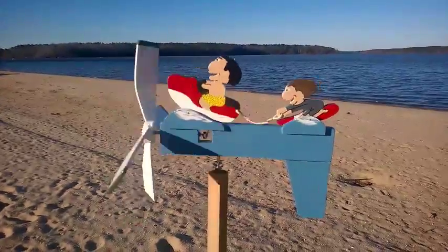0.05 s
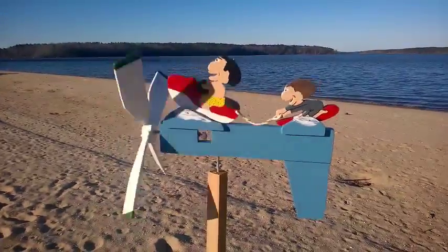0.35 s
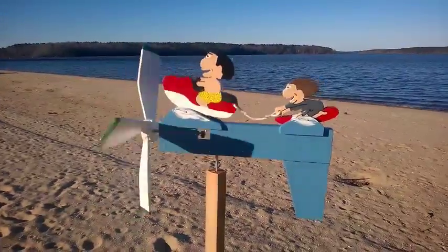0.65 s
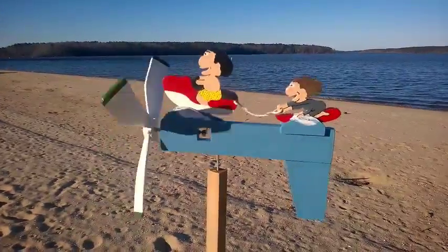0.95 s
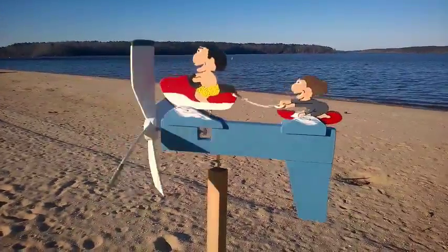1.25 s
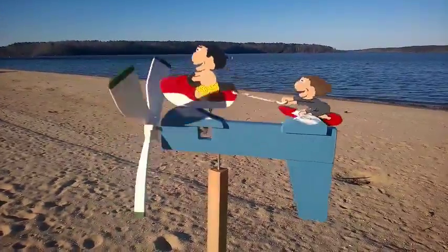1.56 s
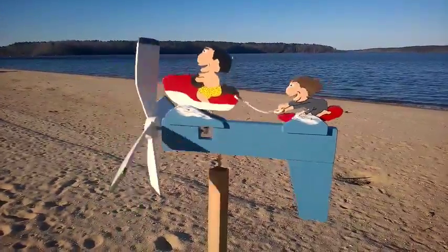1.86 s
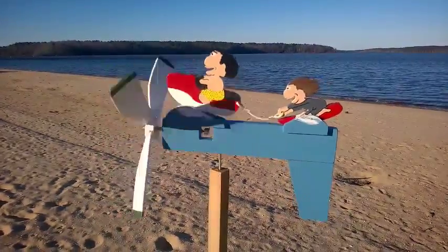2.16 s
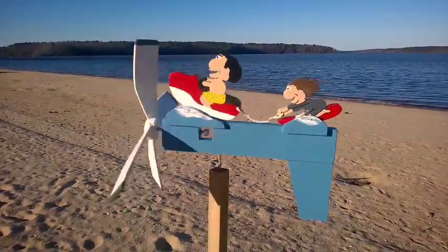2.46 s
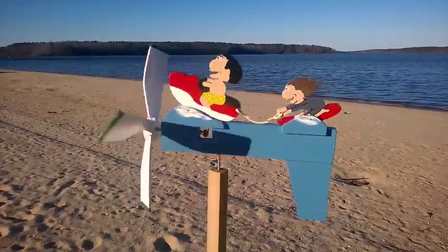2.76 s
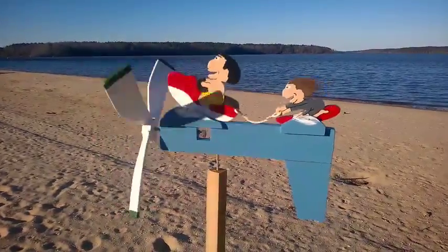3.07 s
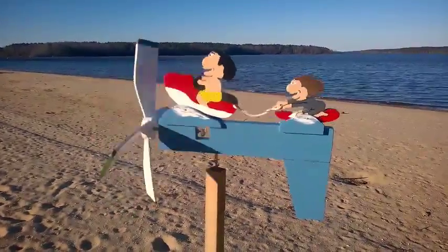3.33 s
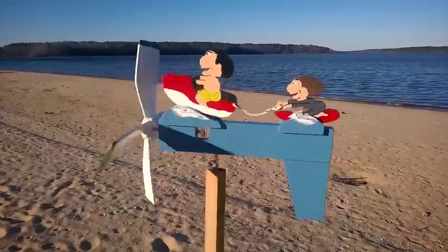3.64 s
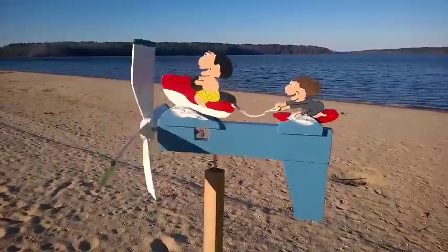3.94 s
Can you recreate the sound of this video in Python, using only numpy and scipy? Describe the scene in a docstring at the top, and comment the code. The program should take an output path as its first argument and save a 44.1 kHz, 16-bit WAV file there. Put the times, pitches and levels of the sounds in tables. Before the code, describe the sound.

A wooden whirligig clacks and rattles close by for the whole four seconds, its quick, uneven hollow knocks mixed with wire ticks and brief scrapes. Some knocks ring briefly between about 1 and 2.5 seconds, and the sharpest come near 3.4 and 3.7 seconds. Small waves wash softly behind. Wind rumbles on the microphone with a few dull thumps, gusting hardest just before 3 seconds.

```python
"""Wooden clacks and rattles from a whirligig turning in a breeze, about three turns a second.
Its wire crank jerks two plywood figures: loose joints knock, the hollow housing answers,
one figure rings on some turns, and the wire ticks, scrapes and rubs in its holes.
Small waves wash a lake beach behind it; wind buffets the microphone."""
import sys
import numpy as np
from scipy import signal
from scipy.fft import rfft, irfft
from scipy.io import wavfile
from scipy.ndimage import uniform_filter1d

SR = 44100
rng = np.random.default_rng(int(sys.argv[2]) if len(sys.argv) > 2 else 0)


def store_pcm(level_fs):
    """Save levels as 16-bit WAV."""
    pcm = np.round(np.clip(level_fs, -1, 1) * 32767).astype(np.int16)
    wavfile.write(sys.argv[1], SR, np.atleast_2d(pcm).T)


N = 176400
T = np.arange(SR // 7) / SR  # time axis of one blow, s
ATTACK_SAMPLES = 220
KNOCK_RISE_S, KNOCK_T60_S, TONE_T60_S = 0.0013, 0.024, 0.029
HOUSING_RISE_S, LINK_HZ = 0.0046, 3125


# Each row: start in seconds, knock level in dB, knock pitch in Hz, housing in dB, wire in dB.
JOINT_CLACKS = [(0.0384, -46.5, 2750, -56, -71), (0.0502, -52.5, 2600, -64.5, -78),
                (0.2553, -60, 3630, -63.5, -65), (0.302, -51, 2880, -72, -62),
                (0.396, -47.5, 2790, -60.5, -65), (0.7499, -48.5, 2800, -55.5, -65),
                (1.1011, -48.5, 2700, -53, -64.5), (1.31, -56, 2730, -63, -63.5),
                (1.4519, -52, 2790, -57, -66), (1.7927, -51.5, 2790, -51, -64),
                (1.993, -56, 3330, -61.5, -63), (2.04, -50.5, 3046, -61, -68),
                (2.136, -48.5, 2750, -55.5, -64.5), (2.4869, -47, 2726, -54.5, -70),
                (2.683, -52.5, 3100, -64, -55.5), (2.838, -53, 2790, -59.5, -65.5),
                (3.1716, -51.5, 2660, -55, -66), (3.4027, -48.5, 2940, -53, -57.5),
                (3.429, -42, 2980, -62.5, -52), (3.4323, -52, 3290, -76, -58),
                (3.51, -52.5, 2800, -71, -68), (3.7239, -49.5, 2780, -59, -66),
                (3.7312, -48, 2880, -50, -55), (3.8149, -54.5, 2760, -59.5, -66),
                (3.981, -53, 3110, -59.5, -67)]

def clacks():
    """Each joint cracks as it seats and sets the hollow housing sounding."""
    out = np.zeros(N)
    for start_s, knock_db, hz, housing_db, wire_db in JOINT_CLACKS:
        add(out, start_s, amp(knock_db) * knock(hz, tone_db=2.5))
        add(out, start_s, amp(housing_db) * housing())
        add(out, start_s, amp(wire_db) * wire_click())
    return out


# Spectrum of struck wood. Each row: frequency in Hz, gain in dB.
WOOD_SPECTRUM = [(500, -10.5), (1800, -2), (2250, -6), (2950, -1.5), (3700, -5.5), (5400, -4), (6800, -15),
                 (7700, -20.5), (14000, -48)]
# Upper modes of a joint. Each row: frequency in Hz, relative level in dB.
JOINT_MODES = [(3960, -10), (4380, -6.5), (4880, -16), (5600, -12), (6770, -17)]

def knock(hz, tone_db=4, upper_t60_s=0.02, chatter_db=-8.5, chatter_t60_s=0.11, ring_q=12, ring_db=11):
    """Wood on wood: a dry crack, a leading mode, weaker upper ones, then ringing chatter."""
    wood = colour(WOOD_SPECTRUM)
    crack = unit_attack(burst(dying(KNOCK_RISE_S, KNOCK_T60_S), wood))
    chatter = signal.fftconvolve(grainy(len(T)), wood)[:len(T)]
    ringing = signal.lfilter(*signal.iirpeak(hz, ring_q, SR), chatter)
    chatter = unit_rms(chatter + amp(ring_db) * ringing) * dying(KNOCK_RISE_S, chatter_t60_s)
    tone = dying(KNOCK_RISE_S, TONE_T60_S) * sine(hz)
    upper = sum(amp(db - tone_db + 2 * rng.standard_normal()) * sine(mode_hz, rng.random())
                for mode_hz, db in JOINT_MODES)
    modes = unit_attack(tone + upper * dying(KNOCK_RISE_S, upper_t60_s))
    return unit_attack(crack + amp(tone_db) * modes) + amp(chatter_db) * chatter


# Response of the housing. Each row: frequency in Hz, gain in dB.
HOUSING_SPECTRUM = [(150, -1.5), (350, -10), (640, 4), (820, -2.5), (1150, -0.5), (1700, -8), (2100, -12),
                    (9000, -46.5)]

def housing(t60_s=0.22):
    """The housing answers a blow with a hollow knock."""
    return unit_rms(burst(dying(HOUSING_RISE_S, t60_s), colour(HOUSING_SPECTRUM)), size=970)


# Spectrum of a wire contact. Each row: frequency in Hz, gain in dB.
WIRE_SPECTRUM = [(2000, -10), (5500, 3.5), (7800, -9), (9200, -0.5), (12000, -9.5), (14400, -10),
                 (15100, -4), (16200, -34)]

def wire_click(rise_s=0.00027, t60_s=0.03):
    """Wire contact: a short, bright burst."""
    return unit_attack(burst(dying(rise_s, t60_s), colour(WIRE_SPECTRUM)))


# Each row: start in seconds, level in dB.
LINK_TAPS = [(0.058, -51), (.315, -59), (.408, -56.5), (0.441, -63), (.6554, -53.5), (.7642, -47),
             (1.011, -58.5), (1.159, -49.5), (1.466, -54.5), (1.487, -56.5), (1.753, -56), (1.801, -53.5),
             (1.842, -57), (2.188, -58), (2.669, -53.5), (3.041, -50.5), (3.236, -55.5), (3.524, -56.5),
             (3.6516, -51), (3.7395, -50), (3.771, -50.5)]

def taps(housing_db=-15, wire_db=-17):
    """A loose link taps back between blows and barely stirs the housing."""
    out = np.zeros(N)
    for start_s, db in LINK_TAPS:
        hollow = amp(housing_db) * housing()
        bright = amp(wire_db) * wire_click()
        add(out, start_s, amp(db) * (knock(LINK_HZ) + hollow + bright))
    return out


# Each row: start in seconds, level in dB.
FIGURE_STRIKES = [(1.11, -49), (1.462, -51.5), (1.62, -54), (1.803, -46), (2.144, -52.5), (2.490, -56),
                  (3.848, -50)]
# Each row: frequency in Hz, relative level in dB.
FIGURE_MODES = [(1198, 3.5), (1130, -11), (1424, -14.5), (1540, -13.5)]

def figure_rings(t60_s=0.11, judder_t60_s=0.19, judder_db=-9, detune=0.0056):
    """A plywood figure, struck at the end of its stroke, rings and judders against its stop."""
    out = np.zeros(N)
    for start_s, db in FIGURE_STRIKES:
        modes = sum(amp(mode_db) * sine(hz * (1 + detune * rng.standard_normal()), rng.random())
                    for hz, mode_db in FIGURE_MODES)
        ring = unit_rms(modes * dying(KNOCK_RISE_S, t60_s))
        contact = modes * dying(KNOCK_RISE_S, KNOCK_T60_S)
        judder = unit_rms(burst(dying(HOUSING_RISE_S, judder_t60_s), contact))
        add(out, start_s, amp(db) * unit_rms(ring + amp(judder_db) * judder, size=400))
    return out


# Each row: start in seconds, level in dB, pitch in Hz.
FRAME_THUMPS = [(.298, -32, 38.7), (0.649, -31.5, 100), (.749, -32.5, 49), (1.099, -29.5, 55),
                (3.18, -44, 218), (3.731, -25, 47.3), (3.733, -44, 646), (3.736, -42.5, 186.5)]

def thumps(rise_s=0.00597, t60_s=0.096):
    """The frame lurches in dull, heavily damped swings."""
    out = np.zeros(N)
    for start_s, db, hz in FRAME_THUMPS:
        add(out, start_s, -amp(db) * dying(rise_s, t60_s) * sine(hz))
    return out


# Each row: start in seconds, length in seconds, level in dB.
LINKAGE_SCRAPES = [(1.337, 0.045, -63.5), (1.753, 0.047, -63), (1.782, 0.029, -55.5), (2.351, 0.066, -67),
                   (3.409, .035, -56.5), (3.618, 0.058, -62), (3.932, 0.13, -61)]

def scrapes(slips_per_s=190, grit_db=-10, wire_db=-4):
    """Wire sticks and slips on wood: uneven contacts, each gritty and briefly ringing."""
    out = np.zeros(N)
    bodies = colour(WOOD_SPECTRUM), damped_sine(LINK_HZ, TONE_T60_S), colour(WIRE_SPECTRUM)
    for start_s, length_s, db in LINKAGE_SCRAPES:
        size = int(length_s * SR)
        slips = unit_rms(rng.standard_normal(len(T)) * (rng.random(len(T)) < slips_per_s / SR))
        arch = np.sqrt(np.maximum(T * (length_s - T), 0))
        drive = arch * (slips + amp(grit_db) * grainy(len(T)))
        wood, ring, wire = (unit_rms(signal.fftconvolve(drive, body)[:len(T)], size) for body in bodies)
        add(out, start_s, amp(db) * unit_rms(wood + 0.5 * ring + amp(wire_db) * wire, size))
    return out


# Each row: start in seconds, level in dB before boost_db.
CRANK_TICKS = [(0.612, -69), (1.237, -70), (1.657, -71), (1.696, -71), (2.248, -69.5), (2.336, -70.5),
               (2.378, -71), (2.69, -68), (3.003, -67.5), (3.02, -66), (3.312, -69)]

def ticks(boost_db=3, wood_db=-62, squeak_hz=15100, squeak_db=2, squeak_t60_s=0.032):
    """The wire crank touches its wooden holes; harder ticks carry more of a high, hissy squeak."""
    out = np.zeros(N)
    squeak_mode = T * damped_sine(squeak_hz, t60_s=0.003)
    hardest_db = max(db for _, db in CRANK_TICKS)
    for start_s, db in CRANK_TICKS:
        tick = wire_click(rise_s=KNOCK_RISE_S)
        squeak = unit_attack(burst(dying(KNOCK_RISE_S, squeak_t60_s), squeak_mode))
        tick += amp(squeak_db + 2 * (db - hardest_db)) * squeak
        add(out, start_s, amp(db + boost_db) * tick + amp(wood_db) * knock(LINK_HZ))
    return out


def crank_rub(turn_s=0.344, peak_s=0.319, width_s=0.025, level_db=-65.5, band_hz=330, wire_db=-15):
    """Once a turn the crank drags through its bearing: a grainy rasp in the wood's resonance."""
    from_peak_s = (np.arange(N) / SR - peak_s + turn_s / 2) % turn_s - turn_s / 2
    envelope = np.exp(-(from_peak_s / width_s) ** 2)
    slips = grainy(N)
    wood = unit_rms(signal.lfilter(*signal.iirpeak(LINK_HZ, LINK_HZ / band_hz, SR), slips))
    wire = unit_rms(signal.fftconvolve(slips, colour(WIRE_SPECTRUM))[:N])
    return amp(level_db) * envelope * (wood + amp(wire_db) * wire)


def rattles(per_s=14, level_db=-67, spread_db=1.5, wire_db=-12):
    """Slack in the linkage: light wood knocks and wire clicks at random moments."""
    out = np.zeros(N)
    for when, wood_draw, wire_draw, pitch_draw in rng.random((int(per_s * N / SR), 4)):
        strengths = np.minimum(-np.log([wood_draw, wire_draw]), np.e) - 1
        knock_db, click_db = level_db + spread_db * strengths
        click = amp(click_db + wire_db) * wire_click()
        hz = LINK_HZ * (1 + 0.2 * (pitch_draw - 0.5))
        add(out, when * N / SR, amp(knock_db) * knock(hz) + click)
    return out


# Each row: frequency in Hz, gain in dB.
WATER_SPECTRUM = [(250, -6), (560, -1.5), (1300, -2.5), (2050, -14), (2800, -12), (3800, -23.5),
                  (5700, -18), (7800, -32), (16000, -37.5)]
# Each row: time in seconds, level in dB.
WASH_LEVELS = [(0, -71), (.7, -63.5), (1.15, -60.5), (1.56, -62.5), (2.25, -63.5), (2.55, -57), (2.95, -62),
               (3.8, -59)]

def waves(lap_db=2.5, patch_db=3, hiss_db=-82, calm_above_hz=2500):
    """Small waves lap and splash in short patches of colour, with calm treble and a faint hiss."""
    hz, frame_s, spectrum = signal.stft(noise(WATER_SPECTRUM), SR, nperseg=512)
    blur = np.outer(np.hanning(7), np.hanning(9))  # bins by frames
    patches = unit_rms(signal.fftconvolve(rng.standard_normal(spectrum.shape), blur, "same"))
    lap = np.interp(frame_s, np.arange(N) / SR, wander(rate_hz=10))
    depth = 1 / (1 + (hz[:, None] / calm_above_hz) ** 2)
    spectrum *= amp(depth * (patch_db * patches + lap_db * lap))
    wash = unit_rms(signal.istft(spectrum, nperseg=512)[1][:N])
    return amp(curve(WASH_LEVELS)) * wash + amp(hiss_db) * rng.standard_normal(N)


# Each row: frequency in Hz, gain in dB.
WIND_SPECTRUM = [(12, -20.5), (30, 4), (80, 0), (125, -11), (210, -25), (900, -71.5)]
# Each row: time in seconds, relative strength in dB.
GUST_LEVELS = [(0, -40.5), (.2, -51), (.33, -42.5), (.55, -45.5), (1.0, -44), (1.55, -49), (1.8, -58),
               (2.25, -53), (2.76, -34.5), (2.83, -38), (2.93, -36), (3.08, -56.5), (3.3, -51), (3.42, -42),
               (4, -45)]

def wind(rumble_db=-1, lump_db=3, flutter_hz=190, flutter_db=14):
    """Gusts buffet the microphone with a lumpy rumble; the strongest add a higher flutter."""
    rumble = noise(WIND_SPECTRUM)
    rumble /= np.sqrt(uniform_filter1d(rumble ** 2, size=6000) + 1e-6)  # steady the level
    octave = signal.butter(2, [flutter_hz / np.sqrt(2), flutter_hz * np.sqrt(2)], "band", fs=SR)
    flutter = unit_rms(signal.lfilter(*octave, rng.standard_normal(N)))
    gust = amp(curve(GUST_LEVELS))
    lumps = amp(lump_db * np.clip(wander(rate_hz=17), -2, 2))
    return lumps * (amp(rumble_db) * gust * rumble + amp(flutter_db) * gust ** 2 * flutter)


def amp(db):
    """Decibels to gain."""
    return 10 ** (np.asarray(db) / 20)


def unit_rms(x, size=None):
    """Scales to rms 1 over the first size samples (default: all)."""
    return x / np.sqrt(np.mean(x[:size] ** 2) + 1e-20)


def unit_attack(x):
    """Scales to rms 1 over the attack."""
    return unit_rms(x, ATTACK_SAMPLES)


def curve(points):
    """Joins (seconds, value) rows by straight lines."""
    return np.interp(np.arange(N) / SR, *np.transpose(points))


def add(mix, start_s, sound):
    """Mixes a sound in at start_s."""
    part = mix[max(round(start_s * SR), 0):][:len(sound)]
    part += sound[:len(part)]


def sine(hz, phase_turns=0):
    """Sine, one blow long."""
    return np.sin(2 * np.pi * (hz * T + phase_turns))


def damped_sine(hz, t60_s):
    """Impulse response of one mode."""
    return np.exp(-np.log(1000) * T / t60_s) * sine(hz)


def dying(rise_s, t60_s):
    """Envelope: linear rise, exponential decay."""
    return np.minimum(T / rise_s, 1) * np.exp(-np.log(1000) * np.maximum(T - rise_s, 0) / t60_s)


def colour(points, size=2048):
    """Minimum-phase impulse response from (Hz, dB) rows."""
    hz, db = np.transpose(points)
    bin_db = np.interp(np.log(np.fft.rfftfreq(size, 1 / SR) + 1), np.log(hz), db)
    cepstrum = irfft(np.log(amp(bin_db)))
    cepstrum[1:size // 2] *= 2
    cepstrum[size // 2 + 1:] = 0
    return irfft(np.exp(rfft(cepstrum)))


def burst(envelope, response):
    """A cluster of tiny contacts heard through a body."""
    return signal.fftconvolve(rng.standard_normal(len(T)) * envelope, response)[:len(T)]


def grainy(size, depth_db=0.5):
    """Noise whose level jitters by the millisecond, rms 1."""
    jitter = unit_rms(uniform_filter1d(rng.standard_normal(size), size=90))
    return unit_rms(rng.standard_normal(size) * amp(depth_db * np.clip(jitter, -2, 2)))


def noise(points, size=8192):
    """Steady coloured noise, rms 1."""
    white = rng.standard_normal(N + size - 1)
    return unit_rms(signal.fftconvolve(white, colour(points, size), "valid"))


def wander(rate_hz):
    """Slow random motion, rms 1."""
    hz = np.fft.rfftfreq(N, 1 / SR)
    lowpass = np.exp(-(hz / rate_hz) ** 2) * (hz > 0)
    return unit_rms(irfft(rfft(rng.standard_normal(N)) * lowpass, N))


def scene():
    """Whirligig close by, shore behind, wind on the microphone; mono."""
    whirligig = clacks() + taps() + scrapes() + ticks() + figure_rings()
    whirligig += thumps() + crank_rub() + rattles()
    return (whirligig + waves() + wind())[None]


def record(dry, cutoff_hz=17000):
    """Steep low-pass."""
    lowpass = signal.firwin(511, cutoff_hz, window=("kaiser", 9), fs=SR)
    return signal.oaconvolve(dry, lowpass[None], "same")


dry = scene()
out = record(dry)
store_pcm(out)
```